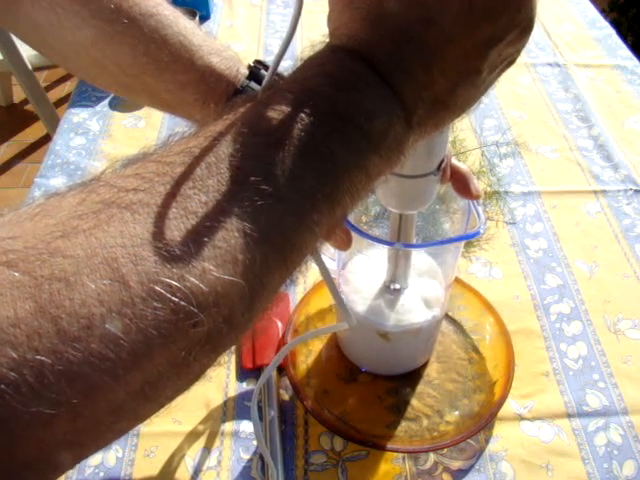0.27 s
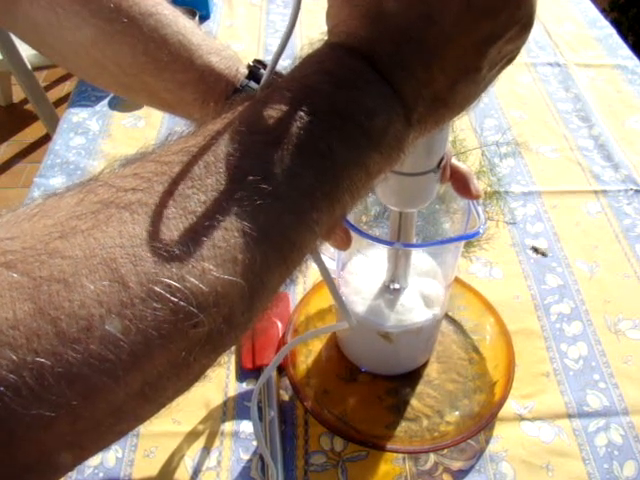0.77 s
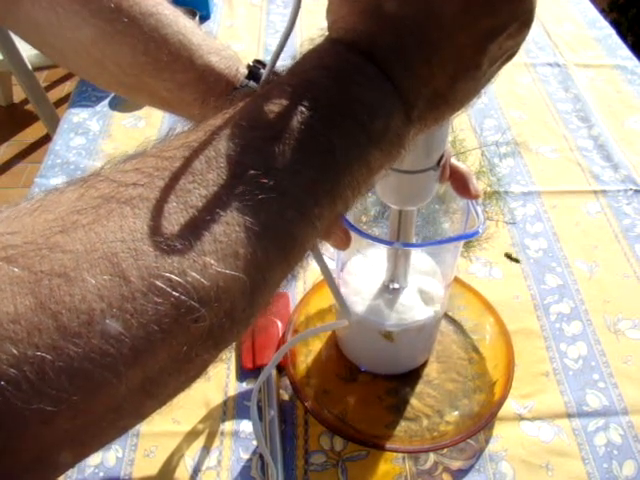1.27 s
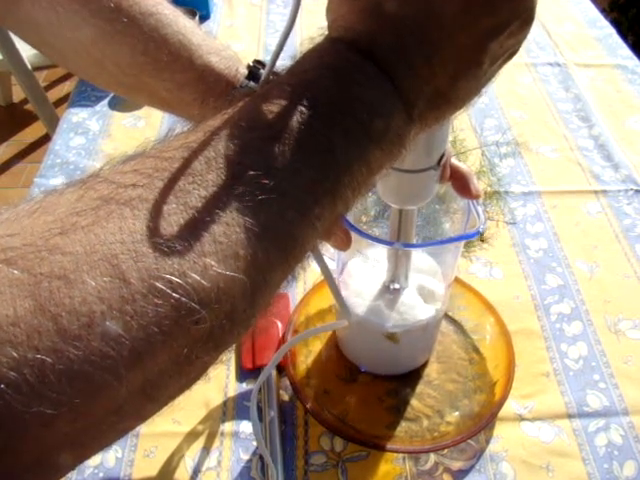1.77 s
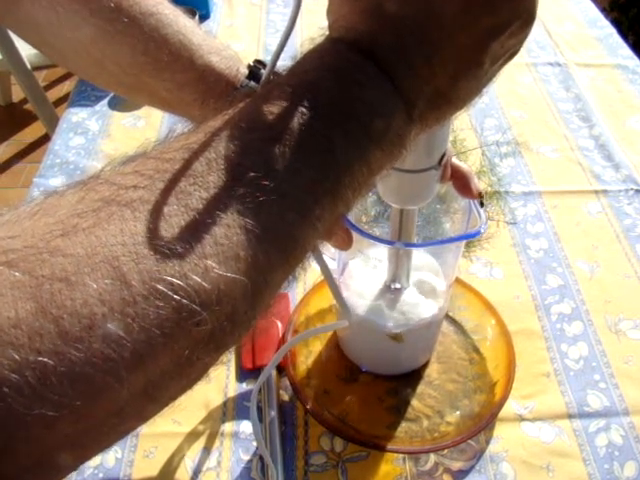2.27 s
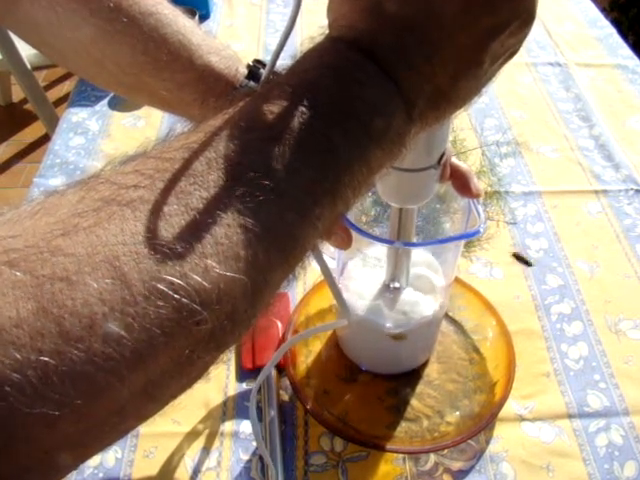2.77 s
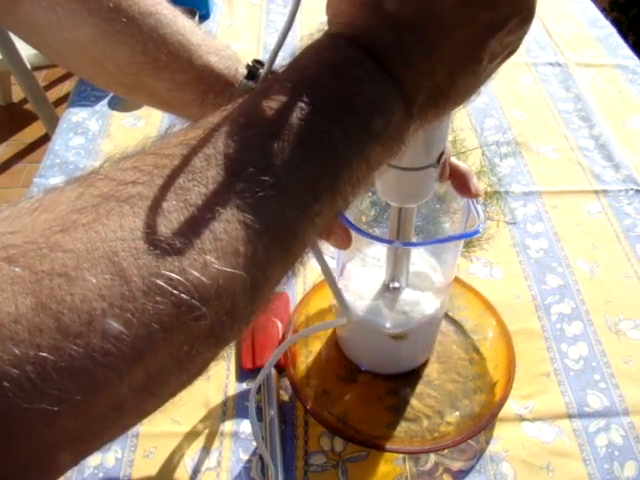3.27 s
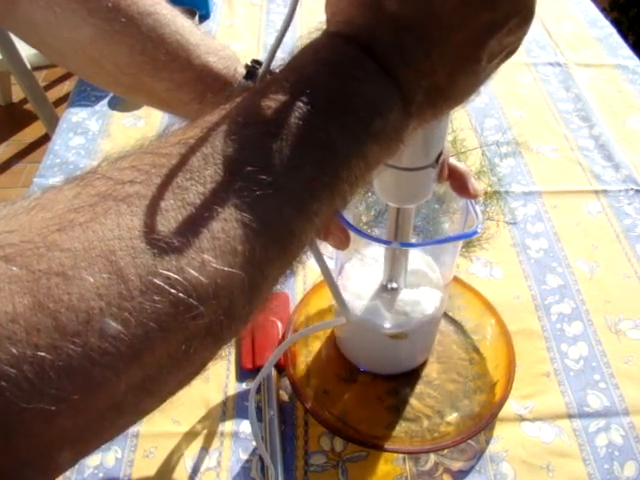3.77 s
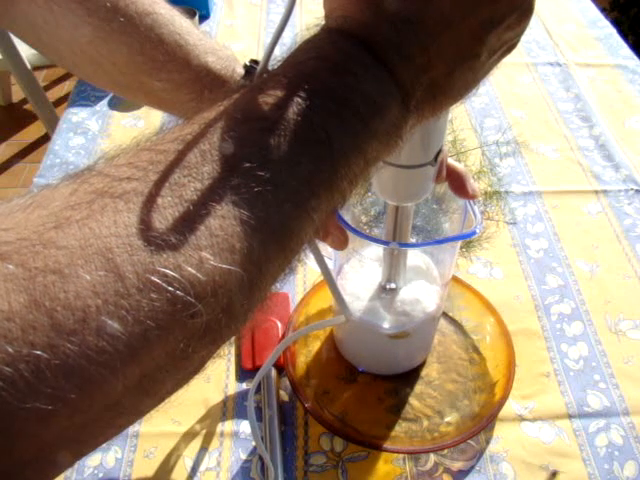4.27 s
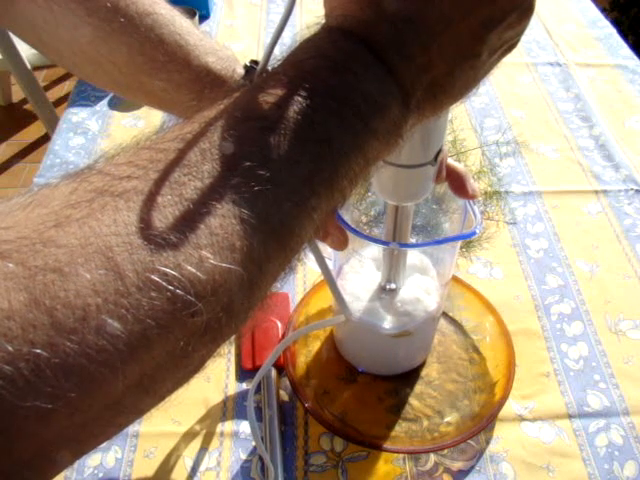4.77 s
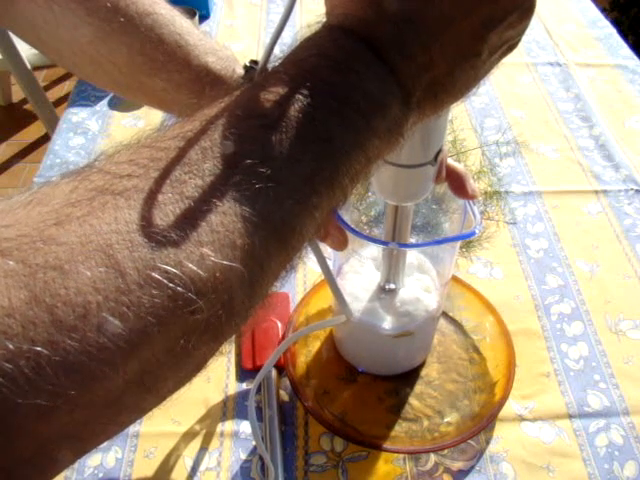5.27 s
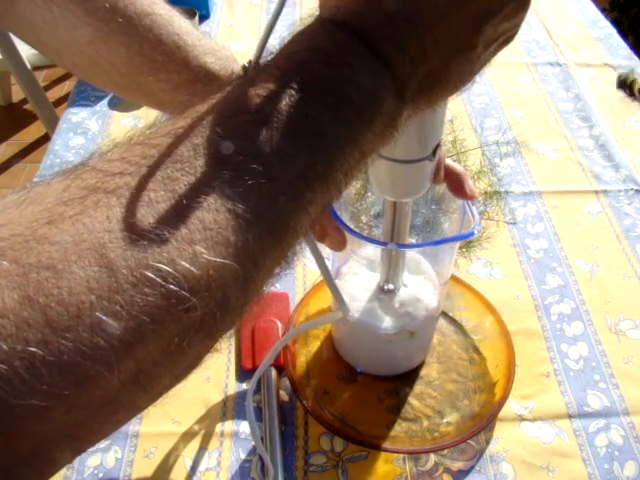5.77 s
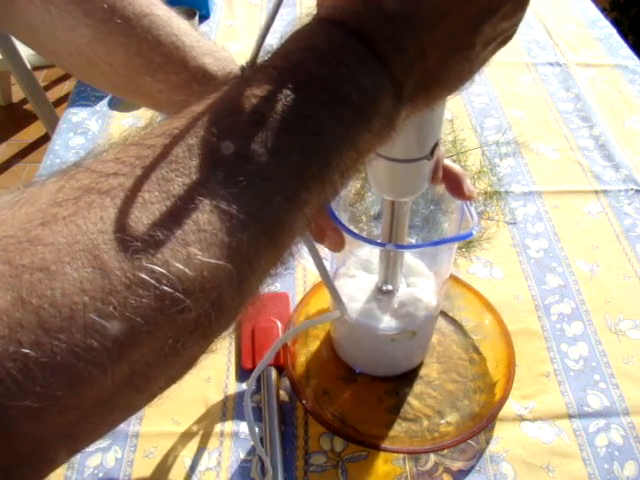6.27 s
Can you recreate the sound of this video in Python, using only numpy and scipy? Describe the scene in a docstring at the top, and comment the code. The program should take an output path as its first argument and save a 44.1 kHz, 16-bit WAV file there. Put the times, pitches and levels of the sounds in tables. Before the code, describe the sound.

Steady hum and churning roar of a hand blender in liquid, broken by two brief pauses outdoors.

```python
"""A stick blender churns thick liquid in a tall plastic beaker, twice switched off and restarted.
Harmonics of the shaft rotation hum over a turbulent roar that pulses once a turn, and the beaker's
air column resonates. The beaker rings in short swells and the loose coupling rattles, mostly as the
motor runs down or up. Faint garden hiss, far insects and a brief wasp fill the pauses."""
import sys
import numpy as np
from scipy import signal
from scipy.fft import rfft, irfft, next_fast_len
from scipy.io import wavfile
from scipy.ndimage import uniform_filter1d, map_coordinates

SR = 44100
rng = np.random.default_rng(int(sys.argv[2]) if len(sys.argv) > 2 else 0)


def unload_wav(signal):
    """Save mono or channel-first audio to the path in sys.argv[1] as 16-bit WAV at rate SR, clipped to [-1, 1]."""
    wavfile.write(
        sys.argv[1],
        SR,
        np.round(np.clip(np.atleast_2d(signal).T, -1, 1) * 32767).astype(np.int16),
    )


N = 286650

# Spectrum of the garden hiss. Each row: frequency in Hz, relative density in dB.
GARDEN_SPECTRUM = [(18, -40), (30, -21.5), (96, -24), (123, -9.5), (164, -7), (220, -10), (582, -3),
                   (760, -9), (1400, -10.5), (3040, -20.5), (4590, -20), (6000, -15.5), (10000, -26),
                   (13000, -60.5), (22000, -120)]
# Band of far chirring. Each row: centre in Hz, resonator width in Hz, mean level in dB.
INSECT_BAND = [(4650, 450, -66)]
# Envelope of the wasp. Each row: time in seconds, level of the fundamental in dB.
WASP_LEVELS = [(5.225, -85), (5.245, -54), (5.33, -53), (5.36, -85)]
# Knocks of coupling and button on the housing. Each row: start in seconds, relative level in dB.
KNOCKS = [(3.171, -9), (3.185, -6), (3.1904, -13), (3.2174, -25), (3.2281, -14.5), (3.2354, -23),
          (3.2494, -20), (3.274, -21.5), (3.4522, -12.5), (3.4775, -4.5), (3.485, -5), (3.49, -8),
          (3.5215, -5), (5.0138, -5.5), (5.0262, -7), (5.035, -11), (5.075, -17), (5.111, -22), (5.33, -26),
          (5.34, -25), (5.3537, -16), (5.374, -8)]
# Resonances that a knock excites. Each row: frequency in Hz, width in Hz, gain per pass in dB.
KNOCK_MODES = [(1800, 700, 0), (3350, 800, 0), (5200, 1500, -8)]
# Short ringing swells of the beaker's resonance, mostly as the motor runs down or up.
# Each row: centre in seconds, pitch in Hz, peak before flutter in dB, Gaussian width in seconds.
BEAKER_SWELLS = [(3.092, 585, -17, 0.019), (3.18, 572, -15, 0.0049), (3.22, 580, -15.5, 0.0068),
                 (3.489, 385, -19.5, .01), (3.532, 574, -15.5, 0.015), (3.578, 580, -17, 0.0088),
                 (3.619, 582, -12, .01), (3.732, 575, -13, .012), (4.98, 562, -17, 0.007),
                 (5.043, 573, -8, 0.01), (5.067, 573, -14, 0.0041), (5.09, 568, -20.5, 0.015),
                 (5.138, 572, -36, 0.018), (5.389, 565, -12, 0.016), (5.54, 568, -17.5, 0.011),
                 (6.331, 569, -15.5, 0.011)]
# Air column and wall resonances. Each row: frequency in Hz, width in Hz, relative gain in dB.
BEAKER_MODES = [(575.8, 18.3, 7), (537, 37, -10.5), (302.5, 15, -16.5)]
# Resonances of the housing. Each row: frequency in Hz, width in Hz, gain in dB.
HOUSING_MODES = [(1710, 360, -14), (1990, 120, -4), (3430, 270, -10), (6190, 100, -14.5), (7630, 120, 0)]
# Cancellations off beaker and table. Each row: frequency in Hz, width in Hz, subtracted gain in dB.
NOTCHES = [(2157, 160, -10.5), (1494, 25, -16), (5555, 410, -4.5), (7820, 500, -6.5)]
# Spectra of the liquid's roar and spray. Each row: frequency in Hz, relative density in dB.
ROAR_SPECTRUM = [(18, -72.5), (30, -45), (117, -55.5), (274, -14), (330, -16), (406, -4), (460, -8),
                 (589, -5), (695, -9.5), (820, -4), (948, -9), (1660, -4.5), (2210, -9), (3280, -8.5),
                 (4200, -36.5), (5460, -19.5), (9240, -120)]
SPRAY_SPECTRUM = [(2000, -40.5), (3400, -12), (3740, -5), (5920, -8.5), (7000, -16.5), (10000, -21),
                  (13000, -67), (22000, -120)]
# Strength of churning. Each row: time in seconds, base levels of roar, spray and beaker ring in dB.
CHURN_LEVELS = [(0, -19, -30, -27.5), (.4, -20, -32.5, -30), (.9, -20, -32, -24.5), (1.3, -20, -32, -27),
                (2.2, -20, -30.5, -27.5), (2.55, -18.5, -29.5, -29.5), (3.0, -19.5, -31.5, -26.5),
                (3.13, -21.5, -33, -19.5), (3.6, -19, -32.5, -21), (3.75, -20, -34.5, -26.5),
                (4.1, -21, -33, -25), (4.96, -19, -30, -25), (5.06, -16.5, -30, -23),
                (5.38, -18.5, -33, -21.5), (5.5, -20.5, -33, -19.5), (5.85, -20.5, -32, -26),
                (6.25, -18.5, -28.5, -31), (6.5, -18.5, -30, -23)]
# The hum's balance drifts as the hand tilts the stick.
# Each row: time in seconds, base levels of shaft orders 1 to 5 in dB.
LOW_ORDER_LEVELS = [(0.0, -61, -34.5, -30, -22.5, -33), (0.27, -64, -30, -32, -18, -36),
                    (0.5, -52.5, -25, -38, -20, -36), (0.95, -47.5, -23.5, -34, -21, -45),
                    (1.35, -51, -28, -35, -20.5, -31), (1.95, -58, -26.5, -26, -21, -32.5),
                    (2.2, -45, -25.5, -25, -26, -43), (2.55, -43.5, -23, -34.5, -28, -43),
                    (2.85, -43.5, -21.5, -33.5, -40, -47), (3.13, -47, -21.5, -21, -40, -48),
                    (3.57, -42, -26.5, -29, -39, -41), (3.8, -49, -26.5, -25, -21.5, -31.5),
                    (4.1, -47.5, -24, -22.5, -25, -44), (4.4, -59, -27, -29, -21, -39),
                    (4.96, -60, -25, -23.5, -22, -35), (5.47, -60, -24.5, -27.5, -28, -37),
                    (5.8, -53, -25.5, -28.5, -25, -38), (6.16, -59, -25, -26, -25.5, -32),
                    (6.5, -53, -37, -32, -28, -35)]
# Upper harmonics of the hum. Each row: multiple of the shaft frequency, base level in dB.
HIGH_ORDER_LEVELS = [(6, -39), (7, -38), (8, -36), (9, -38.5)]
# Pauses of the motor. Each row: button release in seconds, next press in seconds.
PAUSES = [(3.135, 3.45), (4.96, 5.335)]

GARDEN_DB, WING_HZ = -50.5, 159
SHAFT_HZ, SAG_HZ_PER_DB = 205.7, .25  # speed at mean load; heavier churning slows the shaft
COAST_S, COAST_BEND = .22, 1.3  # run-down time and its exponent
SPIN_UP_S, SPIN_UP_BEND = .016, 1.8  # run-up time constant; a slow first instant in still liquid
OVERSPEED_HZ, REGRIP_S = 3.5, .25  # after a restart the knife races until the liquid loads it again
BITE_DB, BITE_S = 2.5, .12  # extra churning after a restart, and its time constant
SURGE_DB, SPRAY_SURGE_RATIO, RING_WAVER_DB = .5, 1.2, 3  # random swings of level
BODY_HZ = 900  # the roar below this outlasts the rest as the knife slows
MAINS_HZ, TOP_HZ = 50, 10170


def amp(db):
    """Amplitude ratio of a level in decibels."""
    return 10 ** (np.asarray(db) / 20)


def unit(x):
    """Normalisation to an rms of 1."""
    return x / np.sqrt(np.mean(x ** 2) + 1e-20)


def curves(rows):
    """Linear interpolation of each column after the time, one value per sample."""
    times, *columns = np.transpose(rows)
    return [np.interp(np.arange(N) / SR, times, column) for column in columns]


def wobble(rate):
    """Smooth random modulation: a spline through rate Gaussian knots a second."""
    return map_coordinates(rng.standard_normal(int(N * rate / SR) + 4), [np.arange(N) * rate / SR])


def filtered(x, response):
    """Linear filtering: the spectrum of x is multiplied by a frequency response."""
    size = next_fast_len(N + SR // 2)
    return irfft(rfft(x, size) * response(np.fft.rfftfreq(size, 1 / SR)), size)[..., :N]


def coloured(x, spectrum):
    """Spectral shaping by (Hz, dB) points on a logarithmic frequency axis, to an rms of 1."""
    points_hz, db = np.transpose(spectrum)
    return unit(filtered(x, lambda hz: amp(np.interp(np.log(hz + 1), np.log(points_hz + 1), db))))


def resonant(x, modes):
    """Modal superposition: x drives damped resonators in parallel."""
    return filtered(x, lambda hz: sum(amp(db) * 1j * hz * width / (centre**2 - hz**2 + 1j * hz * width)
                                      for centre, width, db in modes))


def patchy(x, depth_db):
    """Random amplitude modulation over both time and frequency."""
    spectra = signal.stft(x, nperseg=512)[2]
    field = uniform_filter1d(rng.standard_normal(spectra.shape), size=3, axis=0)
    field = uniform_filter1d(field, size=5, axis=1)
    return signal.istft(spectra * amp(depth_db * unit(field)), nperseg=512)[1][:N]


def garden():
    """Broadband hiss, narrowband insect chirring and two harmonics of a wasp's wingbeat superpose."""
    wasp_db, = curves(WASP_LEVELS)
    wing_phase = 2 * np.pi * WING_HZ * np.arange(N) / SR
    wasp = amp(wasp_db) * (np.sin(wing_phase) + .3 * np.sin(2 * wing_phase))
    chirr_db = INSECT_BAND[0][2] + 2 * wobble(11)
    chirr = amp(chirr_db) * unit(resonant(resonant(rng.standard_normal(N), INSECT_BAND), INSECT_BAND))
    hiss = amp(GARDEN_DB + .73 * wobble(22)) * coloured(rng.standard_normal(N), GARDEN_SPECTRUM)
    return wasp + chirr + hiss


def rattle():
    """Impact excitation: short knocks pass twice through the plastic's modes and keep little treble."""
    impacts, t = np.zeros(N), np.arange(SR // 50) / SR
    attack = 1 - np.exp(-t / .00072)
    for start, db in KNOCKS:
        envelope = attack * amp(db - 60 * t / .012)  # 60 dB of decay in 12 ms
        impacts[round(start * SR):][:len(t)] += envelope * rng.standard_normal(len(t))
    softened = filtered(impacts, lambda hz: 1 / (1 + 1j * hz / 4500) ** 2)
    return 2.76 * resonant(resonant(softened, KNOCK_MODES), KNOCK_MODES)


def beaker_swells():
    """Brief resonance: each swell is a tone under a Gaussian envelope, with a fast amplitude flutter."""
    t = np.arange(N) / SR
    tones = sum(amp(db) * np.exp(-.5 * ((t - centre) / width) ** 2) * np.sin(2 * np.pi * hz * t)
                for centre, hz, db, width in BEAKER_SWELLS)
    return amp(2.35 * wobble(90)) * tones


def motor():
    """Inertia smooths each stop and start. Returns share of full speed and seconds since a restart."""
    t = np.arange(N) / SR
    speed, since_restart = np.ones(N), np.full(N, np.inf)
    for off, on in PAUSES:
        run_down = np.clip(1 - (t - off) / COAST_S, 1e-3, 1) ** COAST_BEND
        run_up = (1 - np.exp(-np.clip(t - on, 1e-4, None) / SPIN_UP_S)) ** SPIN_UP_BEND
        speed *= np.where(t < on, run_down, run_up)
        since_restart = np.where(t < on, since_restart, t - on)
    return speed, since_restart


def beaker_ring(speed, ring_db):
    """Forced resonance: sloshing noise drives the beaker's air column and walls."""
    slosh = amp(ring_db) * speed ** 2.4 * rng.standard_normal(N)
    noise_gain = np.std(resonant(rng.standard_normal(N), BEAKER_MODES))
    return resonant(slosh, BEAKER_MODES) / noise_gain


def turbulence(turns, shaft_depth, mains_depth, lumpy_db, patchy_db):
    """Noise modulated once a turn and twice a mains cycle, coloured by resonance and interference."""
    ripple = np.cos(2 * np.pi * 2 * MAINS_HZ * np.arange(N) / SR)
    pulse = 1 + shaft_depth * np.cos(2 * np.pi * turns) + mains_depth * ripple
    lumps = amp(lumpy_db * (.6 * wobble(60) + wobble(450)))
    noise = pulse * lumps * patchy(rng.standard_normal(N), patchy_db)
    return noise + resonant(noise, HOUSING_MODES) - resonant(noise, NOTCHES)


def churning(turns, speed, since_restart, roar_db, spray_db):
    """Flow noise follows power laws of knife speed, so the spray dies faster than the low roar."""
    roar = turbulence(turns, shaft_depth=.055, mains_depth=.071, lumpy_db=.18, patchy_db=1.2)
    roar = coloured(roar, ROAR_SPECTRUM)
    spray = turbulence(turns, shaft_depth=.051, mains_depth=.06, lumpy_db=1.54, patchy_db=1.1)
    spray = coloured(spray, SPRAY_SPECTRUM)
    body = filtered(roar, lambda hz: 1 / (1 + (hz / BODY_HZ) ** 4))
    # An accelerating knife tears into still liquid, louder than its speed alone would make it.
    acceleration = np.clip(np.gradient(speed) * SR, 0, None)
    drive = np.clip(speed + .01 * uniform_filter1d(acceleration, size=600, origin=299), 0, 1.15)
    roar = amp(roar_db) * (drive ** 1.34 * body + drive ** 2.27 * (roar - body))
    spray = amp(spray_db) * drive ** 2.6 * spray
    return amp(BITE_DB * np.exp(-since_restart / BITE_S)) * (roar + spray)


def shaft_hum(turns, speed, since_restart):
    """Periodic rotation radiates a harmonic series; the small body radiates little bass."""
    # Below full speed and just after a restart the blade loses its grip and the hum breaks up.
    breakup_db = 45 * (1 - speed) + 12 * np.exp(-since_restart / .12)
    hum = np.zeros(N)
    for order, db in list(enumerate(curves(LOW_ORDER_LEVELS), 1)) + HIGH_ORDER_LEVELS:
        flutter_db = .67 + 1.5 * (order % 2)  # the two-bladed knife steadies the even orders
        gain = amp(db + flutter_db * wobble(18) - breakup_db * wobble(40) ** 2)
        hum += gain * np.sin(2 * np.pi * (order * turns + rng.random()))
    return filtered(np.sqrt(2) * hum * speed ** 6.5, lambda hz: 1 / (1 + (190 / (hz + 1)) ** 6))


def blender():
    """One motor drives hum, churning and beaker ring; the load of the liquid lowers its speed."""
    speed, since_restart = motor()
    roar_db, spray_db, ring_db = curves(CHURN_LEVELS)
    load_db = roar_db - roar_db.mean()
    shaft_hz = SHAFT_HZ - SAG_HZ_PER_DB * load_db + OVERSPEED_HZ * np.exp(-since_restart / REGRIP_S)
    surge_db = SURGE_DB * wobble(12)
    roar_db += surge_db
    spray_db += SPRAY_SURGE_RATIO * surge_db
    ring_db += RING_WAVER_DB * wobble(14)
    turns = np.cumsum(speed * shaft_hz * (1 + .0007 * wobble(30))) / SR
    hum = shaft_hum(turns, speed, since_restart)
    liquid = churning(turns, speed, since_restart, roar_db, spray_db)
    return hum + liquid + beaker_ring(speed, ring_db)


def scene():
    """Superposition: the pressures of all sources add in one channel."""
    return (blender() + beaker_swells() + rattle() + garden())[None]


def record(dry):
    """Soft saturation rounds the highest peaks, and a steep low-pass limits the bandwidth."""
    rounded = dry / (1 + np.abs(dry / .72) ** 5) ** (1 / 5)
    return filtered(rounded, lambda hz: np.clip((TOP_HZ - hz) / 150, 0, 1))


dry = scene()
out = record(dry)
unload_wav(out)
```